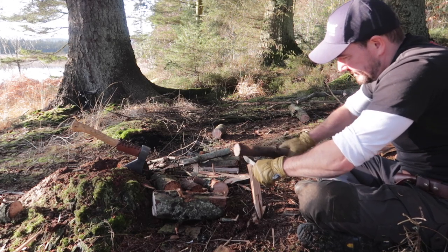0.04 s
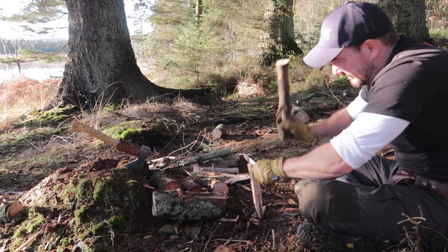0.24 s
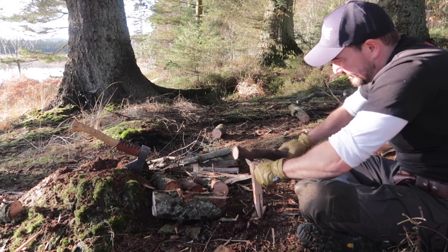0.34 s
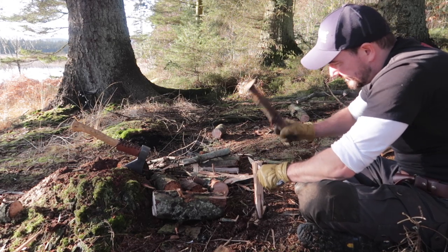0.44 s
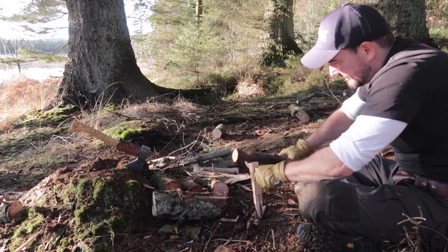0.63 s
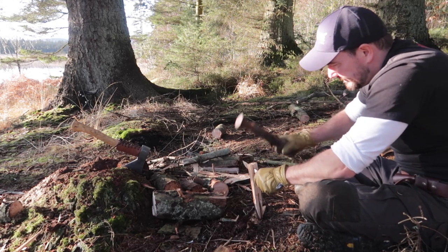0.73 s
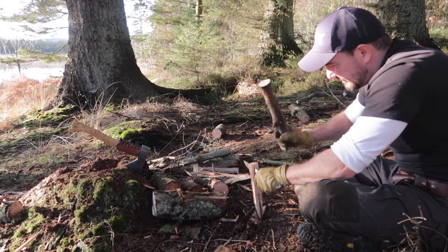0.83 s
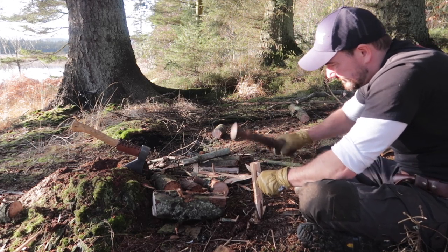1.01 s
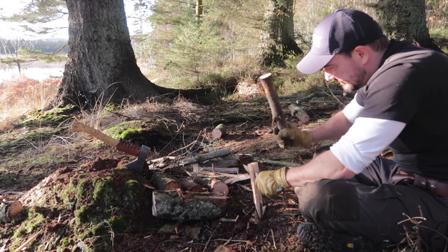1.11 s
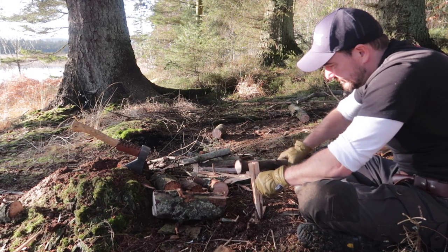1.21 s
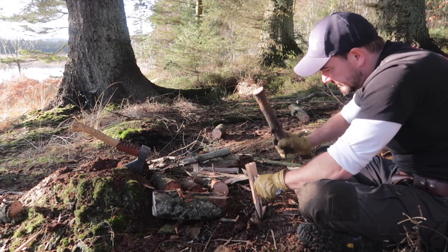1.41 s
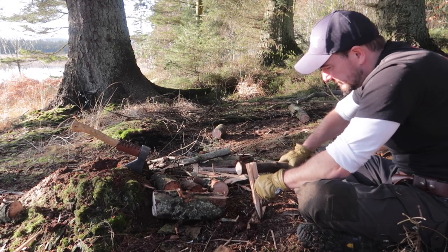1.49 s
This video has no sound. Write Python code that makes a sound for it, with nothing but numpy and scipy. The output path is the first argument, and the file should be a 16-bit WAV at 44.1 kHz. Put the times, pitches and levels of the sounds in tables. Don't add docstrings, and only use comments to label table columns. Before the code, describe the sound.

Five loud, dry wooden cracks at a steady quick pace, as a baton drives a blade down a stick; low soil thuds beneath, brief echoes off tree trunks, quiet forest hush, close stereo microphone.

```python
import sys
import numpy as np
from scipy import signal
from scipy.fft import rfft, irfft, next_fast_len
from scipy.io import wavfile
from scipy.ndimage import uniform_filter1d

SR = 44100
rng = np.random.default_rng(int(sys.argv[2]) if len(sys.argv) > 2 else 0)


def rack_gain(trim_db):
    fader = np.asarray(trim_db, float)
    return 10 ** (fader / 20)


def digitize_waveform(pressure):
    field = np.atleast_2d(pressure).T
    bounded = np.clip(field, -1, 1)
    quanta = np.round(bounded * 32767).astype(np.int16)
    wavfile.write(sys.argv[1], SR, quanta)


N = 68355

# freq_hz, level_db_per_hz
AIR_SPECTRUM = [(50, -2), (110, 2.5), (350, -2.5), (700, -6), (1000, -5.5), (3000, -13), (12600, -27.5),
                (14000, -43)]
# freq_hz, left_right_likeness
AIR_LIKENESS = [(60, 0.99), (240, -0.069), (950, 0.35), (3770, 0.069), (15000, -0.79)]
AIR_LEVEL_DB, AIR_PATCH_DB = -59, 2.1

# freq_hz, level_db, t60_s, direction
GROUND_MODES = [(30, -38, .3, 1), (38, -45, 1.0, -1), (45.5, -42, .26, 1), (66, -45, .32, 1),
                (88, -53, .3, 1), (110, -53, .15, 1)]
SHAKE_LEVELS = [1.6, -2.1, 2.5, -3, -0.5]
CREST_S, SHAKE_RISE_S = 0.0462, 0.025
EARLIER_BLOW_S, EARLIER_SHAKE_DB = -0.225, 4.5

# delay_s, level_db
TRUNK_ECHOES = [(.0155, -47.5), (0.0244, -39.5), (.033, -25), (.046, -43.5), (.068, -32)]
# freq_hz, t60_s
FOREST_DECAY = [(250, 0.25), (700, 0.14), (1700, .4), (2300, 0.25), (2750, 0.46), (3300, 0.86),
                (5000, 0.24), (9000, 0.29)]
# freq_hz, level_db
ECHO_SPECTRUM = [(60, -19.5), (150, -9), (400, -8.5), (800, -6.5), (1400, -5.5), (2750, -5.5), (3400, -11),
                 (4500, -36)]
# freq_hz, left_right_likeness
ECHO_LIKENESS = [(100, 1.0), (300, 0.51), (700, 0.94), (1400, 1), (3100, .9), (6800, 0.16)]
# freq_hz, level_db
SPRAY_SPECTRUM = [(2500, -31.5), (3600, 5.5), (4750, 7.5), (6000, 6.5), (7800, -9), (9000, -31.5),
                  (12000, -48.5)]
FOREST_DB, FOREST_START_S = -21, 0.017

# start_s, level_db, pitch_hz, t60_s, direction
SOIL_THUDS = [
    (0.0756, -3, 106, 0.024, 1),
    (0.3753, -13.5, 114.4, 0.024, 1),
    (.3860, -20.5, 106.6, 0.05, -1),
    (0.6819, -5, 69.7, 0.0087, 1),
    (0.6914, -13, 59.8, 0.013, 1),
    (0.9794, -15, 121, .028, 1),
    (0.9897, -20.5, 109.4, 0.032, -1),
    (1.2684, -18.5, 96, 0.026, 1),
    (1.2739, -21.5, 111.3, 0.062, 1),
]
THUD_SAG, THUD_SAG_S, THUD_CUT_HZ = 1, 0.0024, 45

# start_s, stick_db, blade_db, splinter_db, contact_gap_ms
BATON_BLOWS = [
    (.0755, -4, -15.5, -12, 0.4),
    (0.3743, -6, 1, -14, 0.44),
    (.6800, -12, -9.5, -18, 0.4),
    (0.9777, -6.5, 0, -11, .45),
    (1.2671, -9, 0.5, -10, 0.44),
    (1.5480, -64, -36, -43, 0.51),
]
# freq_hz, level_db, t60_s
STICK_MODES = [(248, -17, 0.017), (457.2, -13, 0.022), (639, -4, 0.014), (895, 1.5, 0.011),
               (1341, 8.5, 0.012), (1739, -8.5, .012), (2101, -6, 0.015), (3402, 1, 0.0092)]
# freq_hz, level_db, t60_s
BLADE_MODES = [(2292, -0.5, 0.0081), (2751, -4.5, 0.016), (3076, -3, 0.014), (3600, -19, .008),
               (4300, -32, .012), (4700, -32.5, 0.027), (5093, -17, .012), (6450, -65, .025),
               (2500, -51, 0.39), (2986, -50, 0.24), (2770, -48.5, 0.4)]
# freq_hz, level_db
SPLINTER_SPECTRUM = [(2000, -3.5), (4000, 3.5), (6000, -8.5), (9000, -14), (13000, -13.5), (15300, -20.5),
                     (16200, -73.5)]
# freq_hz, side_under_mid_db
SIDE_SPECTRUM = [(60, -33.5), (250, -46), (500, -37.5), (1000, -21.5), (2500, -17.5), (5000, -6),
                 (9000, -2.5), (14000, -8)]
CONTACT_S, SECOND_CONTACT_DB, BUILD_S = 0.0003, 1.5, 0.0008
MODE_SPREAD_DB, MODE_SHIFT = 1.5, 0.006
SPLINTER_RISE_S, SPLINTER_T60_S = 0.0014, 0.009
TICK_DB, TICK_LEAD_S = -34, 0.003
RIGHT_DB = 1.1


def read(points, hz):
    f, value = np.transpose(points)
    return np.interp(np.log(hz + 1), np.log(f + 1), value)


def evened(x):
    return x / np.sqrt(np.mean(x ** 2) + 1e-20)


def add(mix, start_s, sound):
    at = round(start_s * SR)
    part = mix[max(at, 0):][:len(sound) + min(at, 0)]
    part += sound[max(-at, 0):][:len(part)]


def colour(x, points, turn=1):
    n = x.shape[-1]
    size = next_fast_len(n + 4096)
    gain = rack_gain(read(points, np.fft.rfftfreq(size, 1 / SR)))
    return irfft(rfft(x, size) * turn * gain, size)[..., :n]


def pair(za, zb, likeness, hz):
    c = np.clip(read(likeness, hz), -1, 1)[:, None]
    mid, side = np.sqrt((1 + c) / 2), np.sqrt((1 - c) / 2)
    return np.array([mid * za + side * zb, mid * za - side * zb])


def air():
    frames, hz = N // 128 + 5, np.fft.rfftfreq(512, 1 / SR)
    a, b, c, d, patches = rng.standard_normal((frames, 257, 5)).T
    patches = uniform_filter1d(patches, 6, 0)
    patches = evened(uniform_filter1d(patches, 20, 1))
    level_db = read(AIR_SPECTRUM, hz)[:, None] + AIR_PATCH_DB * patches
    z = pair(a + 1j * b, c + 1j * d, AIR_LIKENESS, hz) * rack_gain(level_db)
    hush = signal.istft(z, nperseg=512, noverlap=384)[1][:, :N]
    return rack_gain(AIR_LEVEL_DB) * evened(hush)


def ground():
    out, t = np.zeros(N), np.arange(SR) / SR
    since_crest = t - CREST_S
    shake = np.zeros(SR)
    for hz, db, t60_s, direction in GROUND_MODES:
        decay = rack_gain(db - 60 * since_crest / t60_s)
        shake += direction * decay * np.cos(2 * np.pi * hz * since_crest)
    shake *= np.sin(np.pi / 2 * np.minimum(t / SHAKE_RISE_S, 1)) ** 2
    for blow, db in zip(BATON_BLOWS, SHAKE_LEVELS):
        add(out, blow[0], rack_gain(db) * shake)
    add(out, EARLIER_BLOW_S, rack_gain(EARLIER_SHAKE_DB) * shake)
    return out


def forest(x):
    taps = np.zeros((2, SR))
    at = np.arange(0, SR - 20, 20) + rng.integers(0, 20, (2, (SR - 1) // 20))
    np.put_along_axis(taps, at, rng.choice([-1., 1.], at.shape), 1)
    t = np.arange(SR) / SR
    taps *= np.clip(t / FOREST_START_S, 0, 1) ** 2
    hz, when_s, z = signal.stft(taps, SR, nperseg=256)
    decay = rack_gain(-60 * when_s / read(FOREST_DECAY, hz)[:, None])
    z = pair(*z, ECHO_LIKENESS, hz) * decay
    tail = signal.istft(z, SR, nperseg=256)[1][:, :SR]
    tail = rack_gain(FOREST_DB) * tail / np.linalg.norm(tail[0])
    for delay_s, db in TRUNK_ECHOES:
        bark = rng.standard_normal((3, 200)) * np.hanning(200) / 9
        tail[:, round(delay_s * SR):][:, :200] += rack_gain(db) * (bark[0] + 0.15 * bark[1:])
    return signal.fftconvolve(x[None], tail, axes=1)[:, :N]


def thuds():
    out, t = np.zeros(N), np.arange(6000) / SR
    for start_s, db, hz, t60_s, direction in SOIL_THUDS:
        turns = np.cumsum(hz * (1 + THUD_SAG * np.exp(-t / THUD_SAG_S))) / SR
        swing = rack_gain(db - 60 * t / t60_s) * np.sin(2 * np.pi * turns)
        add(out, start_s, np.sign(direction) * swing)
    low_cut = signal.butter(2, THUD_CUT_HZ, "high", fs=SR, output="sos")
    return signal.sosfilt(low_cut, out)


def ring(modes, t, place):
    out = np.zeros(len(t))
    for k, ((hz, db, t60_s), p) in enumerate(zip(modes, place)):
        decay = rack_gain(db + MODE_SPREAD_DB * p - 60 * t / t60_s)
        out += (-1) ** k * decay * np.sin(2 * np.pi * hz * (1 + MODE_SHIFT * p) * t)
    return out * (1 - np.exp(-t / BUILD_S))


def push(at_s):
    t = np.arange(100) / SR
    return np.exp(-((t - at_s) / (CONTACT_S / 4)) ** 2)


def crack(stick_db, blade_db, splinter_db, gap_ms):
    t, place = np.arange(SR // 3) / SR, rng.standard_normal(20)
    first = push(CONTACT_S)
    contact = first + rack_gain(SECOND_CONTACT_DB) * push(CONTACT_S + gap_ms / 1000)
    body = rack_gain(stick_db) * ring(STICK_MODES, t, place)
    body += rack_gain(blade_db) * ring(BLADE_MODES, t, place[8:])
    struck = np.convolve(body, contact / first.sum())[:len(t)]
    snap = evened(colour(rng.standard_normal(len(t)), SPLINTER_SPECTRUM))
    snap *= np.minimum(t / SPLINTER_RISE_S, 1)
    blow = struck + rack_gain(splinter_db - 60 * t / SPLINTER_T60_S) * snap
    out = rack_gain(TICK_DB) * blow
    add(out, TICK_LEAD_S, blow)
    return out


def scene():
    cracks, snaps, low = np.zeros(N), np.zeros(N), thuds()
    for start_s, stick_db, blade_db, splinter_db, gap_ms in BATON_BLOWS:
        add(cracks, start_s - TICK_LEAD_S, crack(stick_db, blade_db, splinter_db, gap_ms))
        add(snaps, start_s, rack_gain([(blade_db + stick_db) / 2]))
    side = colour(cracks, SIDE_SPECTRUM, -np.exp(1j * 1.5))
    near = cracks * rack_gain([[-RIGHT_DB / 2], [RIGHT_DB / 2]]) + side * [[1], [-1]]
    to_trunks = colour(cracks + low, ECHO_SPECTRUM) + colour(snaps, SPRAY_SPECTRUM)
    return near + low + ground() + forest(to_trunks) + air()


def top_cut(x):
    return signal.sosfilt(signal.butter(12, 16430, fs=SR, output="sos"), x)


def record(dry):
    mix = np.clip(dry, -1, 1)
    return top_cut(mix)


dry = scene()
out = record(dry)
digitize_waveform(out)
```